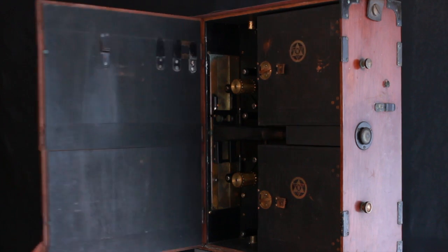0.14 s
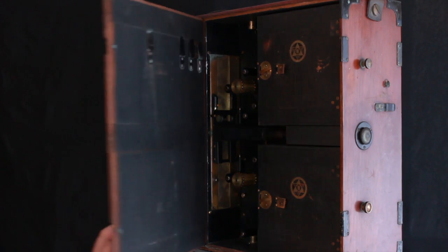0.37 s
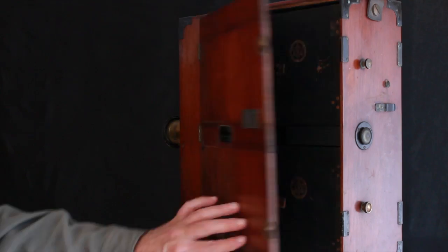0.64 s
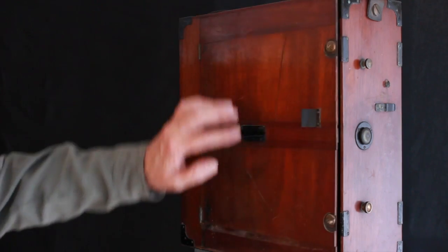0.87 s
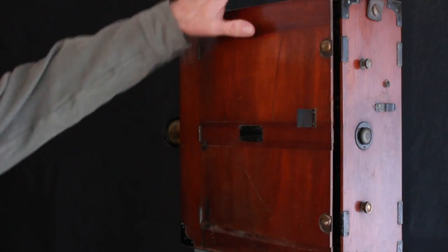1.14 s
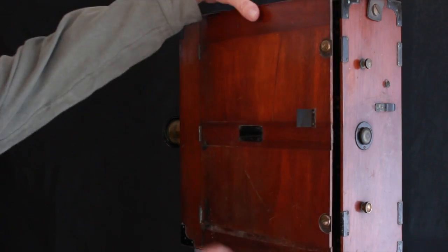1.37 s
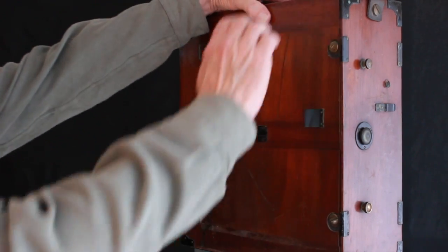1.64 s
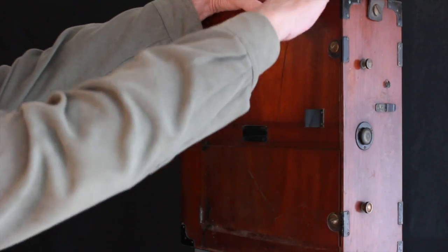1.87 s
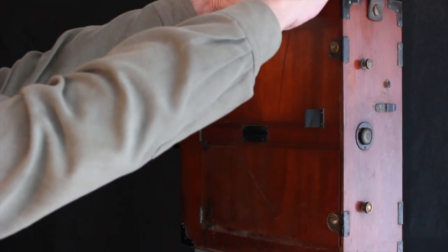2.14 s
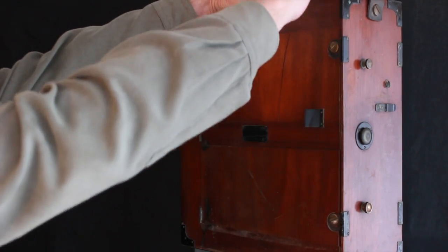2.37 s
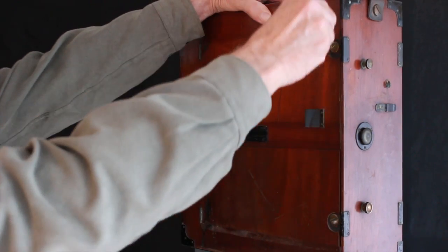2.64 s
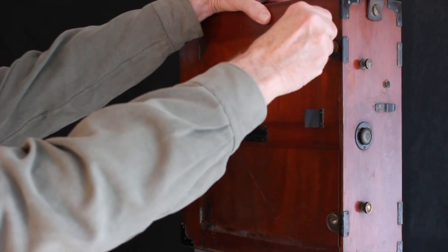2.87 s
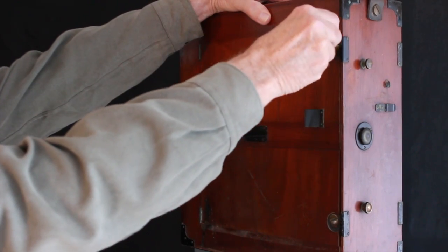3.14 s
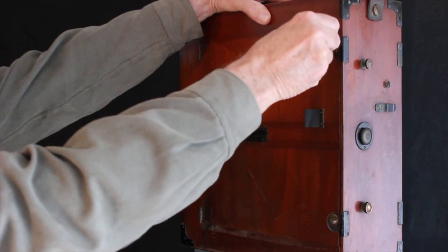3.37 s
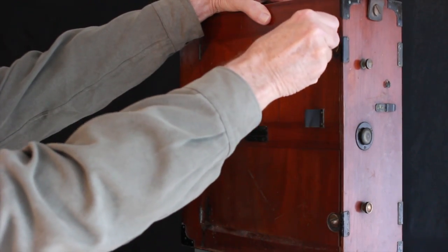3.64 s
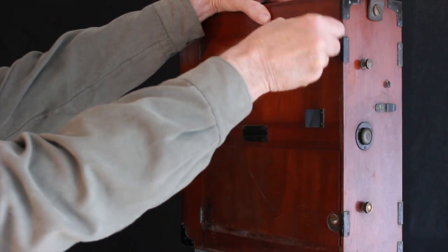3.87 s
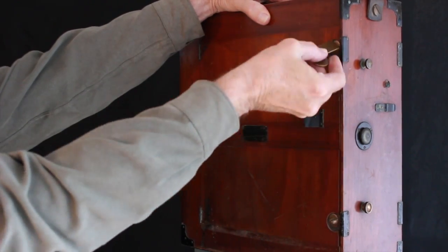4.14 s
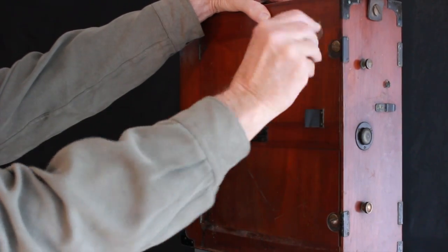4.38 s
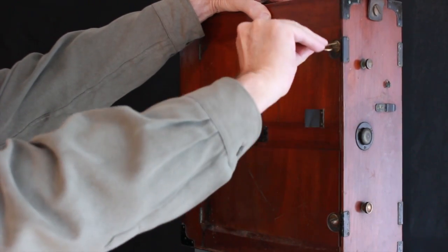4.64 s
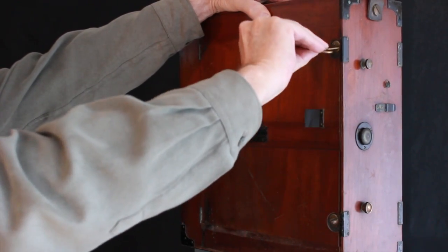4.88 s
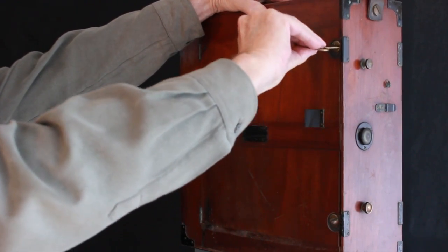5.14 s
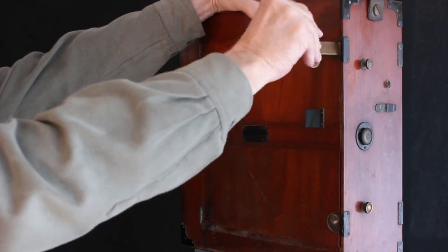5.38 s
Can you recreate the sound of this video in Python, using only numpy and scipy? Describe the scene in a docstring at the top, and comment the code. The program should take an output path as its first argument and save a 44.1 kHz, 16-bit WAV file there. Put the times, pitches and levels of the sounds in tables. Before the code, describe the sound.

Faint ticks and cloth rustle as a wooden door swings over, then two hollow woody knocks as it meets the case. After a pause a brass latch clicks and snaps very sharply, with short scrapes and a rattle of smaller clicks. A wooden bump and two late bright clicks follow. Close microphone, small quiet room, short echo, faint hiss and low hum.

```python
"""Closing a wooden box camera

A wooden door of a box camera is swung shut by hand in a quiet room; a brass latch is slid and turned.
Knocks and ticks are short bursts of clicks that set off dying tones in the wooden case and the brass.
Fingers and latch rub on the wood as dense clicks that ring the same parts; sleeves rustle as filtered
clicks. The room adds a short echo, a wavering low tone and shaped noise, under faint white hiss."""
import sys
import numpy as np
from scipy import signal
from scipy.fft import rfft, irfft
from scipy.io import wavfile

SR = 44100
rng = np.random.default_rng(int(sys.argv[2]) if len(sys.argv) > 2 else 0)


def master(y):
    """Save y as 16-bit WAV."""
    cut = np.clip(np.atleast_2d(y).T, -1, 1)
    pcm = np.round(cut * 32767)  # scale
    wavfile.write(sys.argv[1], SR, pcm.astype(np.int16))


def decibels_to_gain(level_db):
    """Convert a level in decibels to a linear amplitude gain (20 dB per decade)."""
    exponent = np.asarray(level_db, float) / 20
    return 10 ** exponent


N = 243296   # length in samples


def rms_one(x):
    """Scale a signal to rms 1."""
    return x / np.sqrt(np.mean(x ** 2) + 1e-20)


def at_hz(points, hz):
    """Read a curve at any pitch, on a log-frequency axis."""
    f, value = np.transpose(points)
    return np.interp(np.log(np.maximum(hz, 1)), np.log(f), value)


def coloured(x, spectrum):
    """Filter a signal so that some pitches come out stronger than others."""
    hz = np.fft.rfftfreq(len(x), 1 / SR)
    return irfft(rfft(x) * decibels_to_gain(at_hz(spectrum, hz)), len(x))


def drift(rate_hz):
    """Slow random wandering with rms 1: smoothed noise, computed at every 40th sample."""
    r = np.exp(-80 * np.pi * rate_hz / SR)
    noise = rng.standard_normal(N // 40 + 2002)
    slow = signal.lfilter([1], [1, -2 * r, r * r], noise)[2000:]   # skip the filter's start-up
    return np.interp(np.arange(N) / 40, np.arange(len(slow)), rms_one(slow))


def bumps(s, width_s, height):
    """Bell-shaped rises in time, summed."""
    t = np.arange(N) / SR
    return sum(h * np.exp(-.5 * ((t - at) / w) ** 2) for at, w, h in np.broadcast(s, width_s, height))


def grains(per_s, spread_db):
    """Random clicks of uneven size and either sign."""
    sizes = decibels_to_gain(spread_db * np.minimum(rng.exponential(1, N), 4)) * rng.choice([-1, 1], N)
    return sizes * (rng.random(N) < per_s / SR)


def rings(hz, level_db, t60, count):
    """One dying sine a row; the sign flips after every count modes, as node lines are crossed."""
    t = np.arange(SR // 4) / SR
    start = (-1.) ** (np.arange(len(hz)) // count) * decibels_to_gain(level_db)
    decay = decibels_to_gain(-60 * t / t60[:, None])
    return start[:, None] * decay * np.sin(2 * np.pi * np.outer(hz, t))


def bodies():
    """Mode pitches and rings of the wooden case and of the hand-damped brass."""
    # box and door panel: f/Hz, relative level/dB, time to fall 60 dB/s
    wood_modes = [(135, -6.5, 0.049), (171, -15, .1), (186.5, 8, 0.17), (222, -7, 0.07), (261, -7.5, 0.2),
                  (305, -13, 0.12), (378, -3, 0.074), (470, -1, 0.07), (516, 5, 0.1), (610, -8, 0.03),
                  (658, -1, 0.055), (712, -1, 0.04), (784, 4, 0.05), (850, -1, 0.04), (950, -7, .04),
                  (1010, -4, 0.045), (1064, -4, 0.045), (1152, -5, 0.03), (1260, 1, 0.045),
                  (1460, 6, 0.025), (1580, -6, 0.045), (1670, 1, 0.03), (1900, 4, 0.022), (2060, 4, .02),
                  (2230, 4, 0.028), (2560, 7, 0.018), (3130, 8, .018)]
    # brass latch: f/Hz, relative level/dB
    brass_modes = [(2750, -0.5), (3100, 1.5), (3500, 1), (4000, 2.5), (4400, 3.5), (4890, 5), (5360, 5),
                   (5840, 5.5), (6360, 6.5), (7000, 4), (7600, 2), (8500, -1), (9370, 4.5), (10400, 3.5),
                   (11500, 1.5), (12600, -5.5), (14000, -9)]
    brass_cycles = 38   # swings to fall 60 dB
    wood_hz, wood_db, wood_t60 = np.transpose(wood_modes)
    brass_hz, brass_db = np.transpose(brass_modes)
    wood = rings(wood_hz, wood_db, wood_t60, count=3)
    brass = rings(brass_hz, brass_db, brass_cycles / brass_hz, count=1)
    return wood_hz, wood, brass_hz, brass


def favour(hz, colour_hz, drop_db):
    """Where a body is touched decides which modes speak; drop_db is the loss one octave from the colour."""
    return decibels_to_gain(-drop_db * np.log2(hz / colour_hz) ** 2)   # twice as far away, four times the loss


def air():
    """Faint, steady background: random noise with the colour of the quiet room."""
    # colour of the background: f/Hz, relative level per Hz/dB
    air_colour = [(15, -74), (25, -37), (53, -5), (75, -20), (129, -1), (147, -24), (246, 1.5), (281, -7),
                  (421, -9), (2990, -68), (4140, -59), (4990, -22), (5410, -22), (15400, -23.5)]
    level_db = -60
    return decibels_to_gain(level_db) * rms_one(coloured(rng.standard_normal(N), air_colour))


def hum():
    """A low sine that swells and fades while its pitch wavers slightly."""
    # swells of the hum: t/s, level/dB
    swells = [(0.0, -62.5), (0.82, -61.5), (1.8, -61), (2.53, -62), (3.57, -63.5), (4.25, -60.5),
              (5.1, -60)]
    middle_hz, waver_hz, width_s = 87.3, 0.6, 0.2
    s, db = np.transpose(swells)
    hz = middle_hz + waver_hz * drift(1.4)
    tone = np.sqrt(2) * np.sin(2 * np.pi * np.cumsum(hz) / SR)
    return bumps(s, width_s, decibels_to_gain(db)) * tone


def room(x):
    """Dense reflections after a few ms: bands of noise that die faster in the treble."""
    # echo of the room: f/Hz, time to fall 60 dB/s
    echo_t60 = [(200, 0.32), (1000, 0.23), (4000, 0.12), (12000, 0.066)]
    level_db = -13.5
    t, tail = np.arange(SR // 2) / SR, 0
    for low in 88 * 2. ** np.arange(7.1):   # eight bands, an octave apart
        band = signal.butter(2, [low, min(2 * low, 19000)], "band", fs=SR, output="sos")
        noise = signal.sosfilt(band, rng.standard_normal(len(t)))
        tail = tail + noise * decibels_to_gain(-60 * t / at_hz(echo_t60, 1.4 * low))
    tail = tail * np.clip((t - .002) / 0.0011, 0, 1)   # silent for 2 ms, then a quick fade-in
    return decibels_to_gain(level_db) * signal.fftconvolve(x, tail / np.sqrt(np.sum(tail ** 2)))[:N]


def sleeves():
    """Cloth fibres slip as fine clicks, filtered into a dull and a bright patchy rustle."""
    # how briskly the arms move: t/s, bright rustle level/dB
    arm_moves = [(0.0, -61), (0.63, -55), (0.89, -59), (1.38, -52), (1.7, -49), (2.05, -53), (2.28, -62.5),
                 (2.43, -53), (2.6, -59.5), (2.9, -62.5), (3.5, -59), (3.7, -63.5), (3.95, -58.5),
                 (4.21, -58), (4.93, -63), (5.24, -61.5), (5.35, -56.5), (5.52, -57)]
    # a hand shifts its grip and the dull rustle thickens: t/s, width/s, added level/dB
    grips = [(0.9, 0.12, 5), (1.8, 0.11, 8), (2.45, 0.16, 7), (2.85, 0.098, 8), (3.37, 0.15, 16),
             (4.21, 0.28, 6.5), (5.37, 0.14, 11)]
    # dull part of the rustle: f/Hz, relative level per Hz/dB
    dull_colour = [(59, -27), (100, -2.5), (118, -22), (171, 2.5), (230, -5.5), (553, -5), (851, -5),
                   (2500, -18), (3250, -24.5), (5500, -120)]
    # bright part of the rustle: f/Hz, relative level per Hz/dB
    bright_colour = [(880, -18.5), (1500, -5.5), (2940, -6.5), (3500, -2.5), (5030, -4), (9210, -4),
                     (13300, -10), (15400, -14.5)]
    bright_db = np.interp(np.arange(N) / SR, *np.transpose(arm_moves))
    dull_db = bright_db - 4 + bumps(*np.transpose(grips))   # between grips, 4 dB under the bright part
    fibres = grains(9000, spread_db=1.5)
    dull = rms_one(coloured(fibres, dull_colour)) * decibels_to_gain(dull_db + 0.36 * drift(9))
    bright = rms_one(coloured(fibres, bright_colour)) * decibels_to_gain(bright_db + 0.81 * drift(36))
    return dull + bright


def drags():
    """Strokes and slides in one list: peak t/s, rise/ms, fall/ms, wood/dB, wood f/Hz, brass/dB."""
    # fingers and latch dragged on the wood, swelling and fading:
    # peak t/s, length/ms, wood level/dB, wood colour f/Hz, brass level/dB
    strokes = [(0.8, 420, -65, 1480, -59), (1.725, 40, -40.5, 240, -58), (2.279, 96, -48.5, 1045, -49.5),
               (2.31, 195, -56, 1580, -56), (2.465, 72, -45.5, 1000, -59), (2.5, 81, -41, 1090, -41),
               (2.95, 660, -67, 1200, -81), (3.181, 36, -43, 930, -44.5), (3.26, 34, -60, 810, -67),
               (3.295, 31, -36.5, 980, -31), (3.381, 39, -42.5, 510, -52), (3.956, 320, -57, 210, -66),
               (4.04, 48, -62, 220, -60), (4.078, 146, -54.5, 1070, -54), (4.125, 50, -57, 886, -51),
               (4.156, 49, -37.5, 770, -48), (4.27, 130, -53, 270, -88), (4.343, 144, -55, 930, -48.5),
               (5.36, 38, -61, 305, -57), (5.398, 120, -53.5, 930, -48)]
    # parts that slide until they catch, growing and then stopping short:
    # peak t/s, length/ms, wood level/dB, wood colour f/Hz, brass level/dB
    slides = [(1.795, 83, -49, 1300, -39), (2.411, 41, -46, 1530, -45.5), (2.447, 47, -42, 1020, -57),
              (3.2365, 8.2, -37, 920, -24), (3.352, 110, -67, 870, -45.5), (3.461, 19, -69, 590, -48),
              (3.491, 18, -38.5, 925, -32.5)]
    rows = []
    for table, rise_share in [(strokes, 0.5), (slides, 0.98)]:
        for s, ms, *rest in table:
            rows.append((s, rise_share * ms, (1 - rise_share) * ms, *rest))
    return rows


def rubs():
    """Dense stick-slip clicks swell and fade under each stroke and ring the wood and brass."""
    hand_db_per_s = 250   # extra fading of the wood under the pressing hand
    mode_drop_db = 75     # a rubbed spot sets off only the modes near its colour
    out = np.zeros(N + SR)
    wood_hz, wood, brass_hz, brass = bodies()
    held = wood[:, :2000] * decibels_to_gain(-hand_db_per_s * np.arange(2000) / SR)
    slips = grains(3000 * decibels_to_gain(2.5 * drift(90)), spread_db=4)   # about 3000 a second, unevenly
    ringing = rms_one(signal.fftconvolve(slips, brass[:, :600].sum(0))[:N])
    scratch = rms_one(np.diff(slips, prepend=0))
    grit = ringing + 0.24 * scratch
    for s, rise_ms, fall_ms, wood_db, colour_hz, brass_db in drags():
        start, end = s - rise_ms / 1000, min(s + fall_ms / 1000, N / SR)
        a, b = round(start * SR), round(end * SR)
        press = np.interp(np.arange(a, b) / SR, [start, s, end], [0, 1, 0]) ** 1.12
        spot = favour(wood_hz, colour_hz, mode_drop_db) @ held
        groan = signal.fftconvolve(slips[a:b] * press, spot)
        out[a:a + len(groan)] += decibels_to_gain(wood_db) * groan / np.std(groan[:b - a])
        out[a:b] += decibels_to_gain(brass_db) * press * grit[a:b]
    return out[:N]


def touches():
    """Knocks and clicks: t/s, brass/dB, brass f/Hz, wood/dB, wood f/Hz, octave loss/dB, chatter/ms."""
    # hands and the door bump the wooden case:
    # t/s, wood level/dB, wood colour f/Hz, brass peak level/dB, chatter/ms
    knocks = [(0.1111, -48.5, 520, -62, 9.6), (0.4783, -56, 1210, -59, 1.1), (0.796, -56, 200, -60, 1.2),
              (0.917, -50, 380, -60, 3.6), (1.006, -49, 202, -63, 2.5), (1.084, -50, 780, -62, 1.2),
              (1.6758, -40.5, 990, -38, 1.5), (1.679, -36.5, 235, -60, 1.9), (1.7088, -41, 910, -52, 2.5),
              (1.8044, -22.5, 335, -27, 0.46), (1.915, -35, 940, -22, 0.71), (1.916, -25.5, 257, -48, 0.71),
              (2.426, -41.5, 970, -50, .6), (3.37, -36.5, 675, -43, 3.7), (3.955, -48.5, 235, -36.5, 1.4),
              (4.1422, -30, 710, -37, 7.1), (4.154, -37.5, 170, -60, 5.4), (4.1641, -33, 600, -21.5, 1.5),
              (5.344, -51, 910, -42, 2), (5.3542, -42.5, 230, -26, 1.8)]
    # brass parts click and snap: t/s, brass peak level/dB, brass colour f/Hz, wood level/dB, chatter/ms
    clicks = [(0.2177, -35.5, 10800, -65, 2.1), (0.3722, -32.5, 3300, -76, 0.93),
              (0.8101, -40.5, 6900, -59, 5), (1.7611, -25.5, 5800, -43.5, 2.1),
              (2.4975, -26, 4500, -38, 4.1), (3.0558, -16.5, 3520, -20.5, 2.3),
              (3.1742, -32, 6300, -46, 0.61), (3.1864, -40, 5700, -59, 1.5), (3.219, -32, 6740, -54, 0.87),
              (3.2364, 0.1, 6250, -28, .5), (3.2381, -10.5, 5930, -29.5, 2.6),
              (3.2774, -38, 6000, -53, 2.4), (3.2888, -16.5, 5340, -36, 0.86),
              (3.2974, -18.5, 7100, -38.5, 0.86), (3.338, -25.5, 5600, -38, 2.7),
              (3.3515, -28.5, 5900, -44, 2.2), (3.4172, -16.5, 5200, -44, 0.4),
              (3.4613, -16.5, 5430, -44.5, 2.9), (3.4935, -12.5, 4650, -27.5, 2.4),
              (3.4955, -19, 4200, -27, 4.4), (3.651, -32, 4700, -35, 1.5), (3.655, -19.5, 5400, -35, 4.1),
              (3.6731, -9.5, 4660, -21, 0.96), (4.3167, -14.5, 9000, -48, 2.2),
              (4.34, -27.5, 2930, -39.5, 4.7), (5.0331, -14.5, 5860, -29.5, 0.71),
              (5.0365, -9.5, 5200, -29, 0.95), (5.0588, -16.5, 5440, -31, 1)]
    rows = [(s, brass_db, 5200, wood_db, hz, 7, ms) for s, wood_db, hz, brass_db, ms in knocks]
    # clicks reach the panel under the latch, which speaks around 864 Hz
    rows += [(s, brass_db, hz, wood_db, 864, 4, ms) for s, brass_db, hz, wood_db, ms in clicks]
    return rows


def contacts():
    """Each touch is a short chatter of clicks that strikes brass and wood with strengths of its own."""
    crack_db, crack_s = -0.5, 0.0028
    out = np.zeros(N + SR)
    wood_hz, wood, brass_hz, brass = bodies()
    t_ms, early = np.arange(1200) * 1000 / SR, SR // 60
    crack = decibels_to_gain(crack_db) * np.exp(-np.arange(400) / SR / crack_s)
    tick_band = signal.butter(3, [1400, 12000], "band", fs=SR)
    for s, brass_db, tick_hz, wood_db, knock_hz, drop_db, chatter_ms in touches():
        luck = rng.standard_normal(1300)
        bounces = luck[:1200] * (np.abs(luck[100:]) > 1.3)   # chance leaves gaps between bounces
        chatter = 1.74 * bounces * np.exp(-t_ms / max(chatter_ms, .1))
        chatter[0] = 1.8   # first hit
        scatter = decibels_to_gain(2 * luck)   # each touch lands a little elsewhere

        tick = (scatter[:len(brass)] * favour(brass_hz, tick_hz, 12.2)) @ brass
        tick[:len(crack)] += crack * luck[300:300 + len(crack)]   # countless short modes crack at once
        tick = signal.lfilter(*tick_band, signal.fftconvolve(tick, chatter))

        firm = chatter * (t_ms % 1 < .15)   # only bounces early in each ms reach the wood
        knock = (scatter[-len(wood):] * favour(wood_hz, knock_hz, drop_db)) @ wood
        contact = np.exp(-2 * np.pi * 7.5 * knock_hz / SR)   # a duller knock is a longer, softer contact
        knock = signal.fftconvolve(knock, signal.lfilter([1], [1, -contact], firm))
        small_patch = signal.butter(2, 0.38 * knock_hz, "high", fs=SR)   # a small patch moves little air
        knock = signal.lfilter(*small_patch, knock)

        tick = decibels_to_gain(brass_db) * tick / np.abs(tick).max()
        knock = decibels_to_gain(wood_db) * knock / np.std(knock[:early])   # level over the first 1/60 s
        at = round(s * SR)
        out[at:at + len(tick)] += tick + knock
    return out[:N]


def scene():
    """All sources sit in the middle; the small box radiates no deep bass."""
    no_bass = signal.butter(4, 120, "high", fs=SR, output="sos")
    near = signal.sosfilt(no_bass, contacts() + rubs()) + sleeves()
    return np.array([near + room(near) + hum() + air()] * 2)


def roll_off(x):
    """The treble ends steeply here."""
    return signal.sosfilt(signal.butter(12, 15590, fs=SR, output="sos"), x)


def record(dry):
    """Add one white microphone hiss, turned upside down on the right, and clip at full scale."""
    hiss_db = -63
    hiss = decibels_to_gain(hiss_db) * rng.standard_normal(N) * [[1], [-1]]
    return roll_off(np.clip(dry + hiss, -1, 1))


dry = scene()
out = record(dry)
master(out)
```